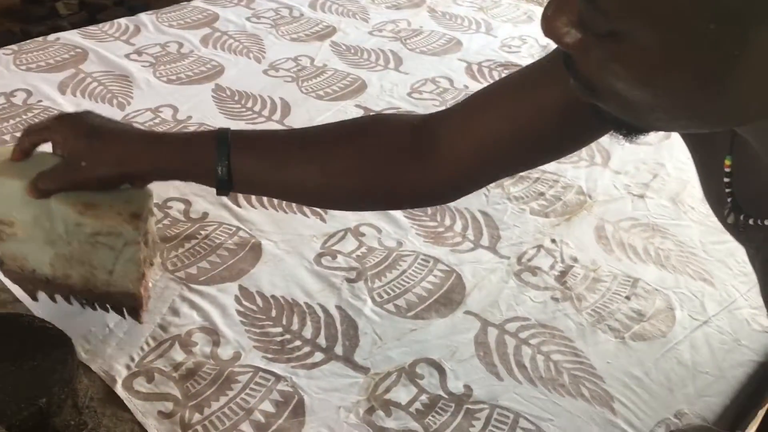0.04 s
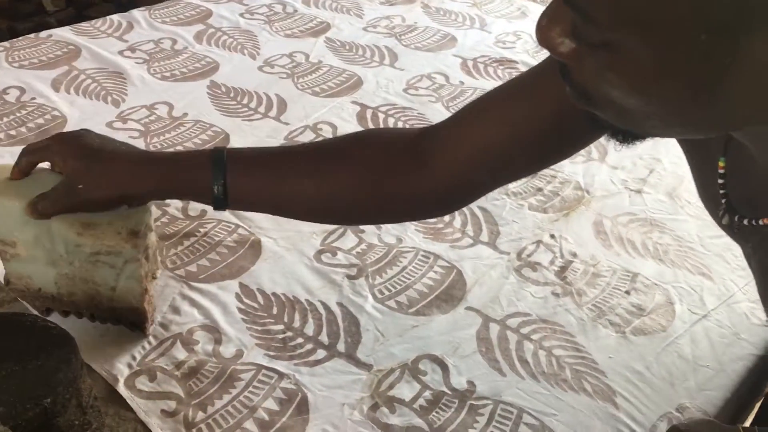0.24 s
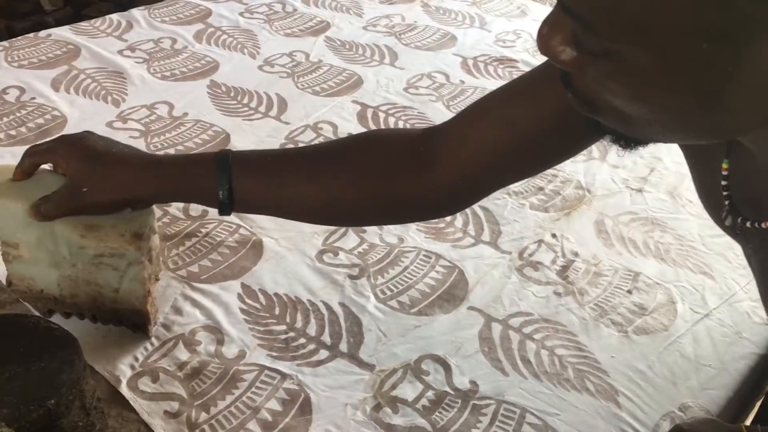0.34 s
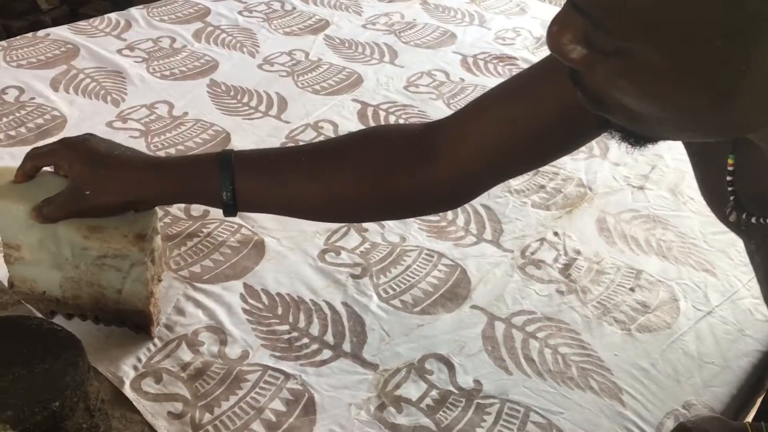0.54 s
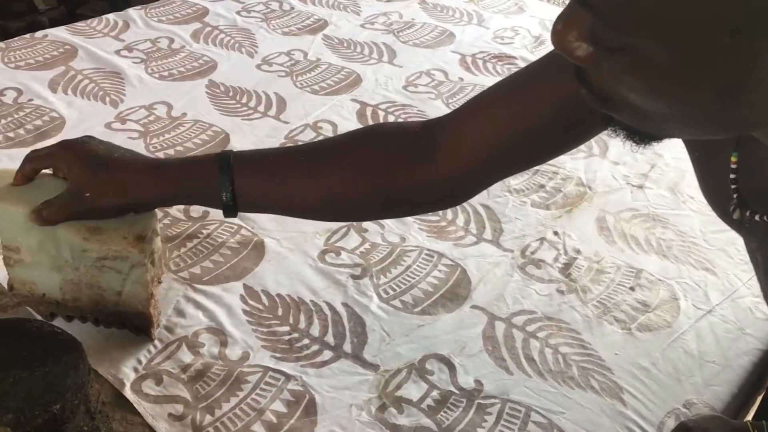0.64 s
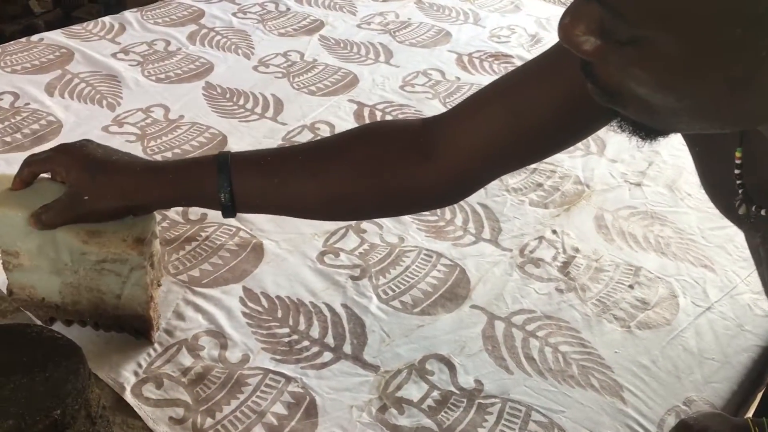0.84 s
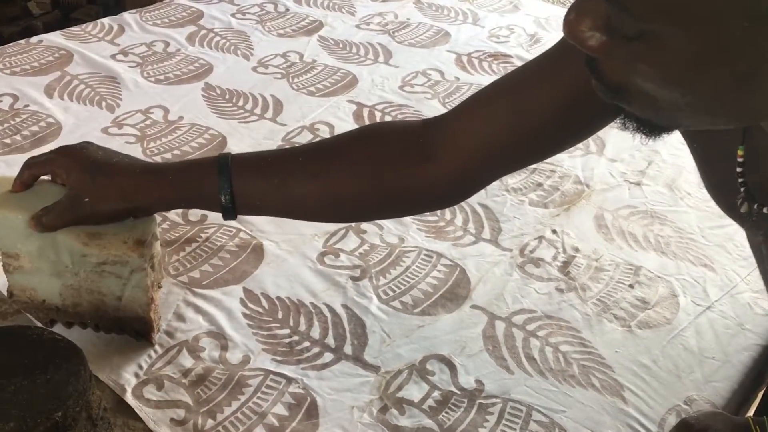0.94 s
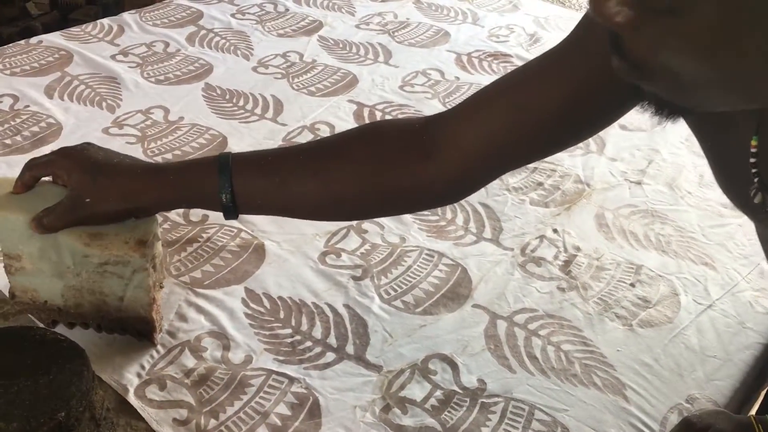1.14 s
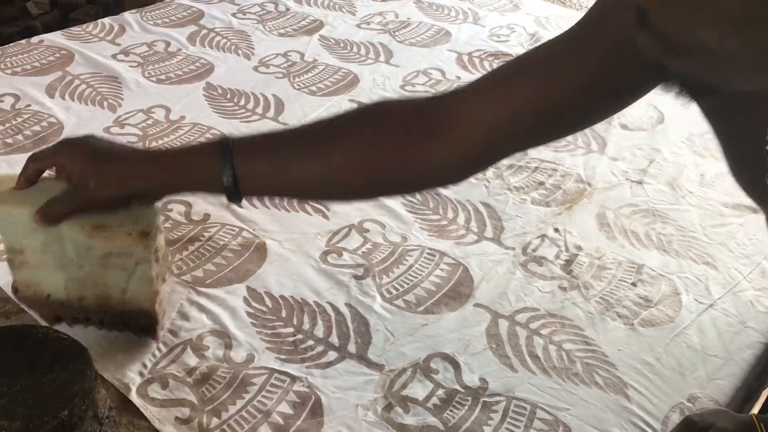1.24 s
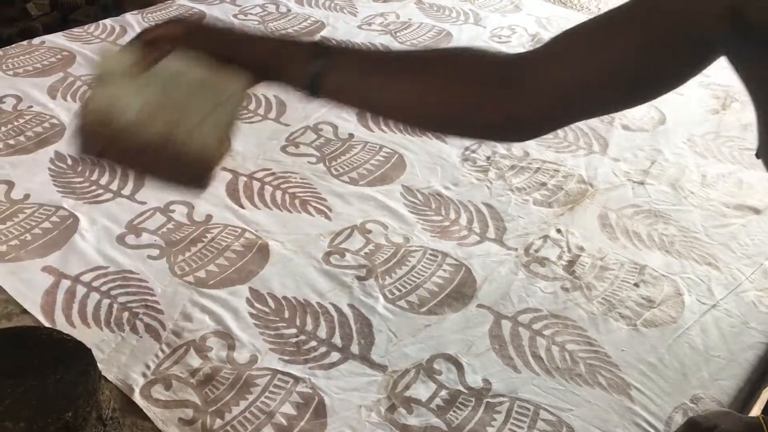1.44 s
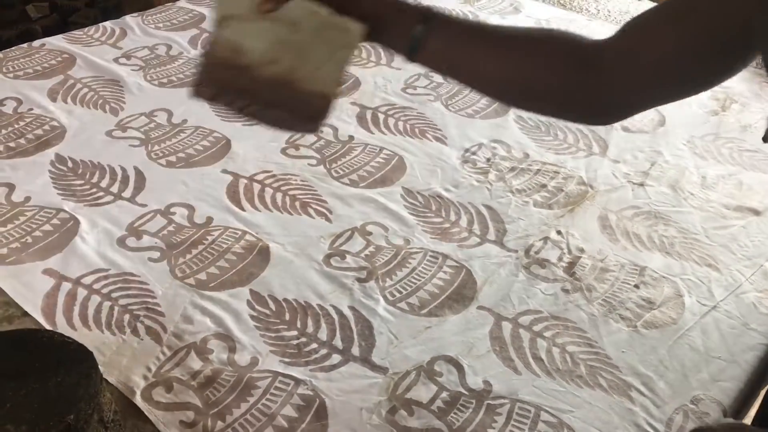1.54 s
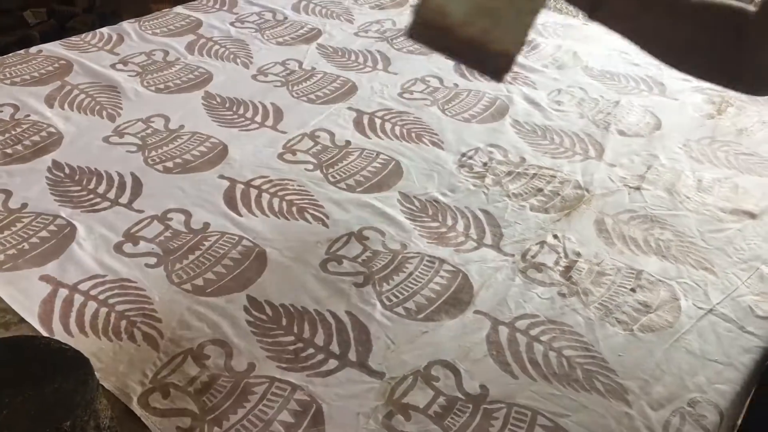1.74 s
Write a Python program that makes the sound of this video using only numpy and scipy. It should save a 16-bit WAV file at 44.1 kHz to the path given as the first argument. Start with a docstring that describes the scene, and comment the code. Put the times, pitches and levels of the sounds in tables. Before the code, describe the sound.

Close, sharp cracks and fine rustling come from a waxy block pushed on fabric, with one low table thump. A faint clink and distant chirps fill a pause, then the block peels away more softly in a quietly humming room.

```python
"""Indoors, a waxy foam block is pressed and rocked on cloth over a table. Its sticky surface lets go
in sharp cracks over a fine rustle, and early in the push the table thumps once in its low modes.
In the lull that follows come a faint clink and two distant chirps. Then the block is peeled off and
lifted away with softer cracks and rustling, while a third chirp sounds.
Throughout, a low hum wavers behind it, with quiet room hiss and a faint high trill."""
import sys
import numpy as np
from scipy import signal
from scipy.fft import rfft, irfft
from scipy.io import wavfile

SR = 44100
rng = np.random.default_rng(int(sys.argv[2]) if len(sys.argv) > 2 else 0)


def unload_audio(sound):
    """Save the sound as a 16-bit wav file, at the path given as the first command line argument."""
    columns = np.transpose(np.atleast_2d(sound))
    # keep every value between -1 and 1, then stretch to whole-number steps
    steps = np.round(np.clip(columns, -1, 1) * 32767)
    wavfile.write(sys.argv[1], SR, steps.astype(np.int16))


N = 79380
T = np.arange(N) / SR

# Releases of the sticky foam. Each row: start in seconds, then gains in dB of the dull body,
# the snap, the treble fizz and the block's hollow ring.
CRACKS = [(.001, -38, -35.5, -52.5, -31), (.062, -36, -54, -68, -51), (0.0777, -30.5, -29, -43.5, -44),
          (0.0921, -44, -48, -47, -67), (.0942, -30.5, -30, -39, -41), (.112, -50, -43, -54, -46),
          (.1283, -43, -40.5, -39.5, -46), (0.1736, -33.5, -45.5, -50, -31), (0.2059, -56, -43, -53, -60),
          (0.2691, -38.5, -37.5, -46, -23.5), (0.339, -62, -52, -67, -39), (0.3563, -42, -49, -64, -35),
          (.4435, -44, -57, -57, -38.5), (0.4666, -39, -31, -42.5, -52), (0.4989, -39, -43, -75, -34),
          (.516, -50, -38, -64, -32), (.546, -54, -40.5, -56, -50), (.565, -54, -47, -55, -38),
          (.608, -61, -50.5, -48, -59), (.6176, -73, -49, -48.5, -67), (0.6374, -40.5, -46.5, -58, -31.5),
          (1.156, -66, -70, -74, -56), (1.2501, -54.5, -47, -68, -55), (1.275, -62, -54, -78, -66),
          (1.376, -61, -69, -86, -67), (1.3905, -59, -61, -81, -66), (1.495, -59.5, -61, -92, -60),
          (1.5239, -53, -57, -64, -43), (1.5833, -49.5, -53, -54.5, -43), (1.622, -54, -49, -60, -36),
          (1.632, -59, -50, -69, -38.5), (1.6647, -52, -55.5, -67, -60), (1.689, -75, -71, -61.5, -75),
          (1.7465, -38, -53.5, -80, -30)]
# Spectrum common to all cracks. Each row: frequency in Hz, gain in dB.
CRACK_SPECTRUM = [(100, 25), (500, -2), (800, 19.5), (1000, 16.5), (1300, 27), (1750, 34.5), (2300, 33.5),
                  (3000, 28.5), (3600, 29), (5500, 28), (8000, 23.5), (12000, 23), (16000, 6)]
# Modes of the block. Each row: frequency in Hz, relative level in dB, T60 in seconds.
BLOCK_MODES = [(1346, -1, 0.015), (1448, -7.5, 0.05), (2335, -13.5, 0.026)]
# Rustle of pressing and of lifting. Each row: time in seconds, body level in dB, treble level in dB.
PRESS_LEVELS = [(0, -37, -54.5), (.05, -47, -51.5), (.085, -43.5, -52), (.14, -43.5, -43.5),
                (.19, -45.5, -52), (.215, -54.5, -51), (.245, -47, -54), (.285, -46.5, -54),
                (.32, -54.5, -60.5), (.37, -52.5, -67.5), (.42, -54.5, -57.5), (.485, -50.5, -51.5),
                (.54, -47.5, -51), (.61, -52, -54), (.66, -57, -62), (.71, -66.5, -76), (.8, -77, -77)]
LIFT_LEVELS = [(1.21, -95, -80), (1.263, -56.5, -65.5), (1.33, -70, -68.5), (1.42, -71, -83),
               (1.512, -73, -70.5), (1.56, -59.5, -69.5), (1.6, -62, -59), (1.628, -49, -54),
               (1.679, -63.5, -67), (1.735, -71, -78), (1.755, -67, -78), (1.8, -61, -77)]
# Spectra of the rustle's body, its treble and its larger ticks.
# Each row: frequency in Hz, relative level in dB.
BODY_SPECTRUM = [(100, -14.5), (600, -16), (1000, -10), (1420, -1.5), (1750, -5), (2200, 1), (2900, -4.5),
                 (3600, -7), (5000, -24), (8000, -30.5), (16000, -59)]
TREBLE_SPECTRUM = [(100, -55), (2500, -4.5), (4000, 4.5), (6000, 6), (8000, 0), (10500, -5.5),
                   (13000, -2.5), (16000, -14.5)]
CRINKLE_SPECTRUM = [(100, -45), (1500, -11), (3200, 1), (6000, -3), (9000, -3.5), (13000, -4), (16000, -9)]
# Modes of the table. Each row: frequency in Hz, level in dB, T60 in seconds, rise time in seconds.
TABLE_MODES = [(76.7, -0.5, 0.095, 0.018), (69.9, -19.5, 0.34, 0.05), (135.7, -19, 0.132, 0.0011),
               (172, -28.5, 0.13, 0.0052), (270, -38, 0.17, 0.0013), (400, -40, 0.12, 0.0028),
               (856, -37.5, 0.092, 0.0023), (1080, -44, 0.029, 0.0011)]
# Dull knocks, some close by and some farther off.
# Each row: start in seconds, level in dB, centre in Hz, width in octaves, T60 in seconds.
KNOCKS = [(0.2199, -37.5, 400, 1.71, 0.16), (.322, -51, 1010, 0.43, 0.057), (0.8549, -52, 1510, 0.77, 0.21),
          (1.3901, -50, 170, 1.8, 0.19)]
# Modes of something hard, farther off. Each row: frequency in Hz, level in dB, T60 in seconds.
CLINK_MODES = [(940, -57.5, 0.16), (1232, -54, 0.2), (1380, -52, 0.05), (1783, -57.5, 0.25),
               (2330, -57, .13)]
# Distant chirps. Each row: start and length in seconds, first and last pitch in Hz, level in dB.
CHIRPS = [(0.931, 0.014, 2450, 3220, -59), (1.017, 0.016, 3090, 2600, -64.5),
          (1.434, 0.056, 6550, 5920, -65.5)]
# Course of the low hum. Each row: time in seconds, frequency in Hz, level in dB.
LOW_HUM = [(0, 52.3, -55.5), (.15, 53.54, -45), (.3, 67.8, -61), (.44, 68.9, -64), (.5, 68.75, -44),
           (.56, 52.1, -51), (.68, 55.1, -48.5), (.72, 53.3, -102), (.92, 60.1, -66.5),
           (.995, 65.17, -50.5), (1.09, 54.02, -52.5), (1.18, 51.03, -47.5), (1.22, 63.56, -60),
           (1.285, 67.9, -45.5), (1.35, 59.8, -72), (1.42, 61.76, -50.5), (1.53, 60.05, -46),
           (1.572, 56.37, -54), (1.62, 54.2, -44), (1.8, 55.2, -44)]
# Swells of the upper hum and of the trill. Each row: time in seconds, level in dB.
UPPER_HUM_LEVELS = [(0, -59.5), (.72, -78), (.81, -50.5), (.87, -64.5), (1.0, -59.5), (1.08, -74),
                    (1.8, -90)]
TRILL_LEVELS = [(0, -90), (.7, -80.5), (.95, -78), (1.2, -80), (1.8, -82)]
# Spectrum of the room hiss. Each row: frequency in Hz, relative level in dB.
HISS_SPECTRUM = [(20, -12), (60, 16), (110, -1), (160, 1), (240, -4.5), (330, -3.5), (450, -15),
                 (650, -12.5), (900, -14), (1400, -16), (2400, -16.5), (4000, -21.5), (7500, -26.5),
                 (9500, -26.5), (11000, -30), (16000, -34)]
# Reverberation of the room. Each row: frequency in Hz, T60 (time to fall by 60 dB) in seconds.
ROOM_T60 = [(100, 0.34), (1500, 0.12), (3000, 0.28), (7000, 0.093), (16000, 0.059)]


def cracks(splinter_db=-8, splinter_t60_s=.0082, bands_hz=(1600, 3700, 10000)):
    """Sudden release of adhesion: a pulse and tiny splinters, comb-filtered by two close reflections."""
    out, t = np.zeros(N), T[:SR // 40]
    for s, body_db, snap_db, fizz_db, _ in CRACKS:
        splinters = rng.standard_normal(len(t)) * amp(-60 * t / splinter_t60_s) * (t > 0)
        pulse = 1. * (t == 0) + amp(splinter_db) * splinters / np.linalg.norm(splinters)
        tilt = list(zip(bands_hz, (body_db, snap_db, fizz_db)))
        spectrum = [(hz, db + at_hz(tilt, hz)) for hz, db in CRACK_SPECTRUM]
        crack = -colour(pulse, spectrum, size=2048)
        add(out, s, crack)
        add(out, s + .0017434, amp(-5.5) * crack)  # off the table top
        add(out, s + .0042, amp(-8.5) * crack)  # off the arm
    return out


def block_ring(rise_s=.00043, low_cut_hz=1030):
    """Impulse response: each crack excites the block's damped modes, heard as a short hollow knock."""
    out, t = np.zeros(N), T[:SR // 5]
    modes = sum(np.sin(2 * np.pi * hz * t) * amp(db - 60 * t / t60) for hz, db, t60 in BLOCK_MODES)
    ring = modes * (1 - np.exp(-t / rise_s))
    for s, *_, ring_db in CRACKS:
        add(out, s, -amp(ring_db) * ring)
    return signal.sosfilt(signal.butter(2, low_cut_hz, "high", fs=SR, output="sos"), out)


def rustle(grains_per_s=7000, spread_db=3.5):
    """Shot noise: thousands of tiny foam cells and fibres let go at random as the block moves."""
    grain_db = spread_db * np.minimum(rng.exponential(1, N), 3.8)
    grains = amp(grain_db) * (rng.random(N) < grains_per_s / SR)
    low, high = grains * rng.choice([-1., 1.], (2, N))  # same instants, independent signs
    levels = PRESS_LEVELS + LIFT_LEVELS
    body = unit(colour(low, BODY_SPECTRUM)) * amp(curve(levels, column=1))
    treble = unit(colour(high, TREBLE_SPECTRUM)) * amp(curve(levels, column=2))
    return body + treble


def crinkle(ticks_per_s=90, relative_db=-7.5):
    """A sparse Poisson process: larger fibres let go in crisp ticks that follow the rustle's treble."""
    ticks = rng.uniform(-1.04, 1, N) * (rng.random(N) < ticks_per_s / SR)
    treble_db = curve(PRESS_LEVELS + LIFT_LEVELS, column=2)
    return unit(colour(ticks, CRINKLE_SPECTRUM)) * amp(relative_db + treble_db)


def table_thump(start_s=.2248):
    """Damped vibration: the push sets the table's modes swinging, and each decays exponentially."""
    out = np.zeros(N)
    for hz, db, t60, rise_s in TABLE_MODES:
        envelope = amp(db - 60 * T / t60) * (1 - np.exp(-T / rise_s))
        add(out, start_s, -np.cos(2 * np.pi * hz * T) * envelope)
    return out


def knocks(rise_s=.00043):
    """Modal overlap: soft contacts excite modes so dense that they ring as a dying band of noise."""
    out = np.zeros(N)
    for s, db, hz, octaves, t60 in KNOCKS:
        band = noise(lambda f: np.exp(-.5 * (np.log2(f / hz) / octaves) ** 2))
        envelope = amp(db - 60 * T / t60) * (1 - np.exp(-T / rise_s))
        add(out, s, band * envelope)
    return out


def clink(start_s=.856):
    """Free vibration: a hard object, struck once, rings in a few inharmonic modes."""
    out = np.zeros(N)
    for hz, db, t60 in CLINK_MODES:
        add(out, start_s, np.sin(2 * np.pi * hz * T) * amp(db - 60 * T / t60))
    return out


def chirps(flutter_depth=.035, flutter_s=.001):
    """Frequency modulation: short, distant whistles glide in pitch with a random flutter."""
    out = np.zeros(N)
    for s, length_s, first_hz, last_hz, db in CHIRPS:
        progress = np.linspace(0, 1, round(length_s * SR))
        glide_hz = first_hz + (last_hz - first_hz) * progress
        flutter = 1 + flutter_depth * wander(flutter_s)[:len(progress)]
        envelope = amp(db) * np.sin(np.pi * progress) ** 2
        add(out, s, envelope * sine(glide_hz * flutter))
    return out


def hum(upper_hz=115, waver_depth=.069, waver_s=.0535):
    """Superposition: a low tone and a weaker one above it each waver in pitch and level."""
    low = amp(curve(LOW_HUM, column=2)) * sine(curve(LOW_HUM, column=1))
    waver = 1 + waver_depth * wander(waver_s)
    upper = amp(curve(UPPER_HUM_LEVELS)) * sine(upper_hz * waver)
    return np.sqrt(2) * (low + upper)  # rms to peak


def trill(centre_hz=8580, width_hz=360, pulses_per_s=58, jitter=.25, depth=.85):
    """Amplitude modulation: a narrow, high band of noise pulses quickly and unevenly."""
    pulsing = sine(pulses_per_s * (1 + jitter * wander(1 / pulses_per_s)))
    band = noise(lambda f: np.exp(-2 * ((f - centre_hz) / width_hz) ** 2))
    return amp(curve(TRILL_LEVELS)) * unit(band * (1 + depth * pulsing))


def hiss(level_db=-56.5):
    """Stationary noise: the room's quiet, broadband floor, strongest in the bass."""
    return amp(level_db) * noise(lambda f: amp(at_hz(HISS_SPECTRUM, f)))


def room(x, early_db=-10, early_t60_s=.022, tail_db=-12.5):
    """Reverberation: near reflections follow the direct sound, then a tail whose top dies first."""
    t = T[:SR // 2]
    early, tail = rng.standard_normal((2, len(t)))
    early *= (t > .0025) * amp(-60 * t / early_t60_s)
    hz, frame_s, bands = signal.stft(tail * (t > .006), SR, nperseg=256)
    decay = amp(-60 * frame_s / at_hz(ROOM_T60, hz)[:, None])
    tail = signal.istft(bands * decay, SR, nperseg=256)[1][:len(t)]
    response = amp(early_db) * early / np.linalg.norm(early) + amp(tail_db) * tail / np.linalg.norm(tail)
    return x + signal.fftconvolve(x, response)[:N]


def amp(db):
    """Amplitude ratio of a level in decibels."""
    return 10 ** (np.asarray(db) / 20)


def unit(x):
    """Normalisation to an rms of one."""
    return x / np.sqrt(np.mean(x ** 2) + 1e-20)


def curve(rows, column=1):
    """Linear interpolation of one column of a time table at every sample."""
    rows = np.array(rows)
    return np.interp(T, rows[:, 0], rows[:, column])


def at_hz(points, hz):
    """Interpolation of a table on a logarithmic frequency axis."""
    f, value = np.transpose(points)
    return np.interp(np.log(hz + 1), np.log(f), value)


def add(mix, s, sound):
    """Superposition of a sound on the mix, starting at s seconds."""
    part = mix[max(0, round(s * SR)):][:len(sound)]
    part += sound[:len(part)]


def sine(hz):
    """An oscillator whose phase is the running integral of its frequency."""
    return np.sin(2 * np.pi * np.cumsum(hz) / SR)


def colour(x, spectrum, size=4096):
    """Minimum-phase filtering: the Hilbert transform of the log gain gives a causal response."""
    hz = abs(np.fft.fftfreq(size, 1 / SR))
    log_gain = np.log(amp(at_hz(spectrum, hz)))
    taps = np.fft.ifft(np.exp(np.conj(signal.hilbert(log_gain)))).real
    return signal.fftconvolve(x, taps[:size // 2])[:len(x)]


def noise(gain):
    """Spectral shaping: white noise weighted by a function of frequency, at an rms of one."""
    hz = np.fft.rfftfreq(N, 1 / SR) + 1
    return unit(irfft(rfft(rng.standard_normal(N)) * gain(hz), N))


def wander(s):
    """Low-pass noise: a smooth drift with an rms of one and a time scale of s seconds."""
    return noise(lambda f: 1 / (1 + (2 * f * s) ** 2))


def scene():
    """Superposition in one channel: the crisp sounds reverberate, and the rest arrive directly."""
    reverberant = room(cracks() + block_ring() + crinkle() + clink() + chirps())
    return (reverberant + rustle() + table_thump() + knocks() + hum() + hiss() + trill())[None]


def record(dry, low_cut_hz=40, high_cut_hz=16200):
    """Band limiting: the microphone rolls off the deep bass and cuts the highest treble."""
    hz = np.fft.rfftfreq(2 * N, 1 / SR) + 1
    high_passed = irfft(rfft(dry, 2 * N) / np.sqrt(1 + (low_cut_hz / hz) ** 10))[:, :N]
    low_pass = signal.firwin(255, high_cut_hz, window=("kaiser", 8), fs=SR)
    return signal.oaconvolve(high_passed, low_pass[None], "same")


dry = scene()
out = record(dry)
unload_audio(out)
```